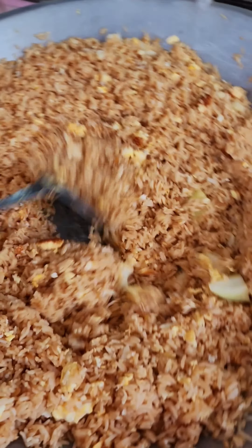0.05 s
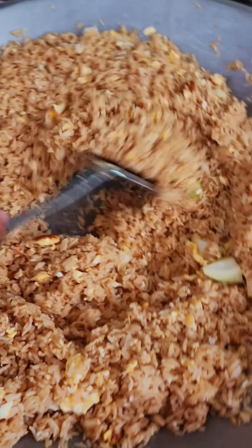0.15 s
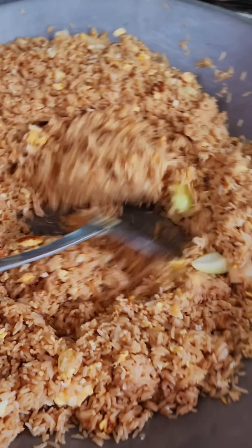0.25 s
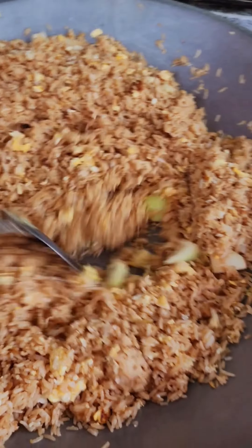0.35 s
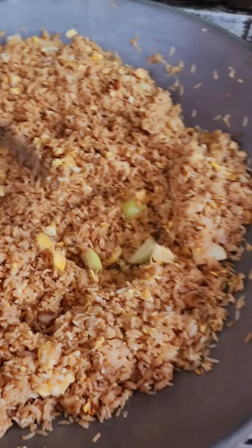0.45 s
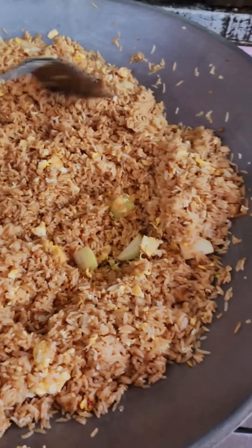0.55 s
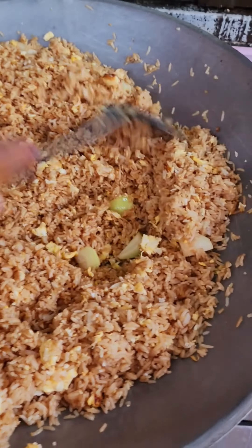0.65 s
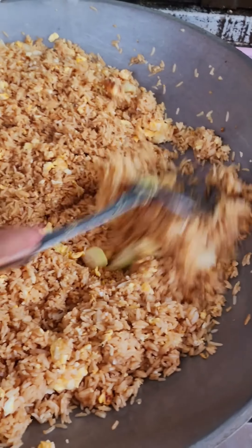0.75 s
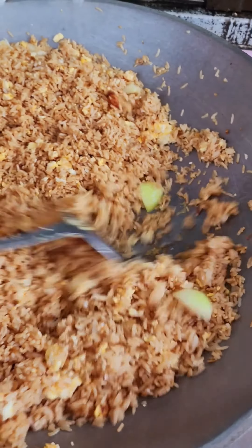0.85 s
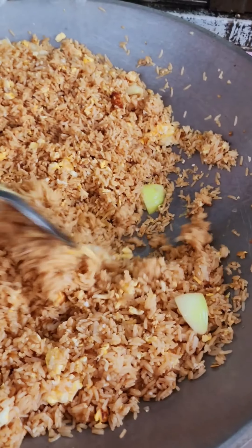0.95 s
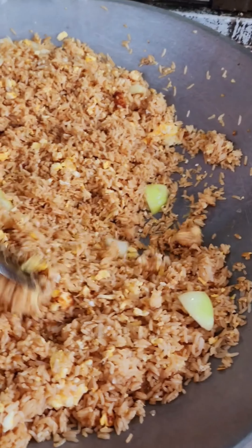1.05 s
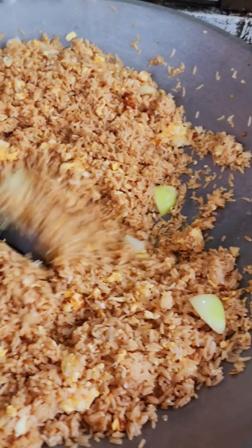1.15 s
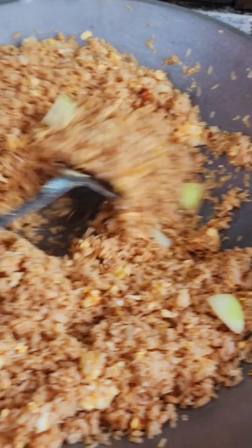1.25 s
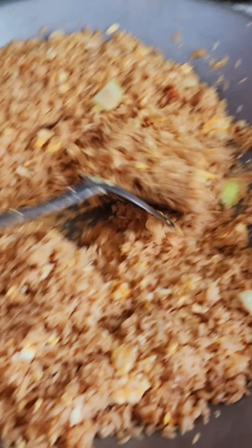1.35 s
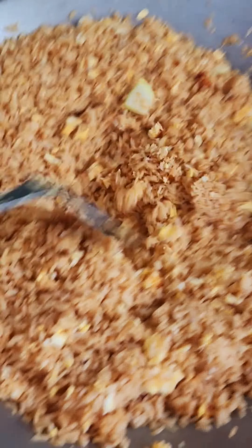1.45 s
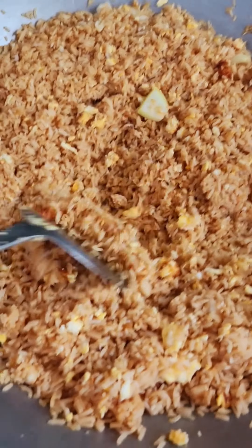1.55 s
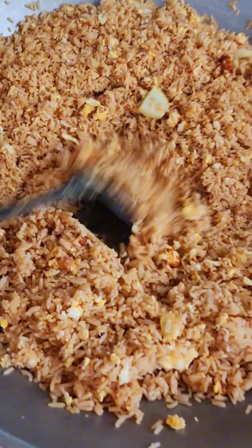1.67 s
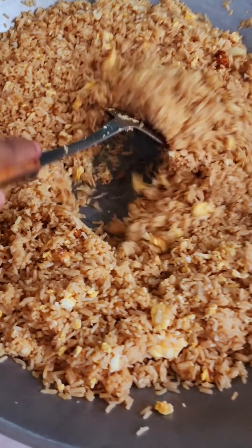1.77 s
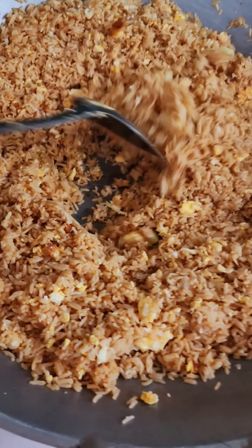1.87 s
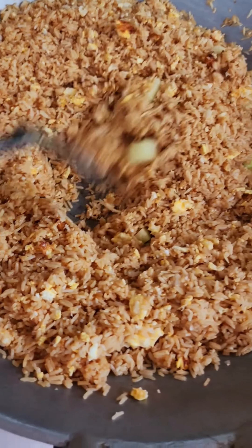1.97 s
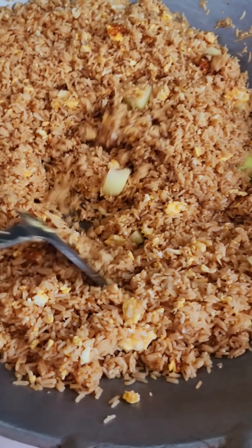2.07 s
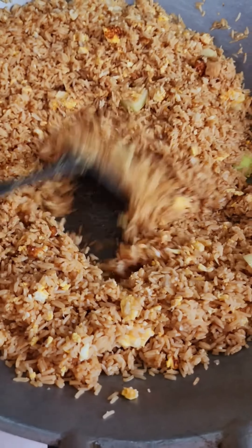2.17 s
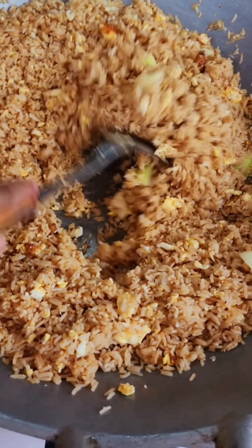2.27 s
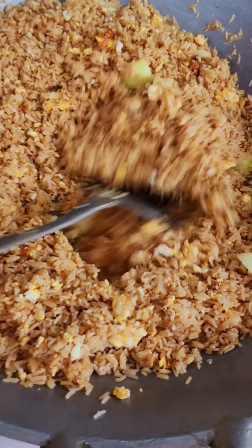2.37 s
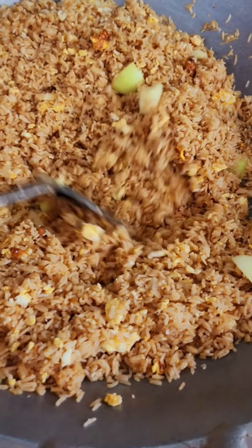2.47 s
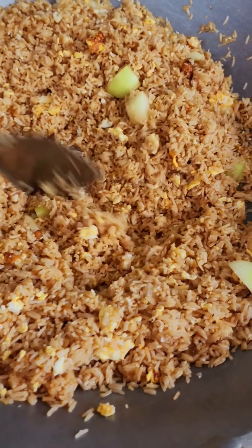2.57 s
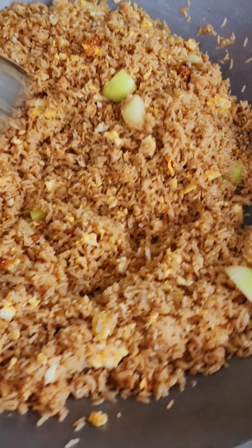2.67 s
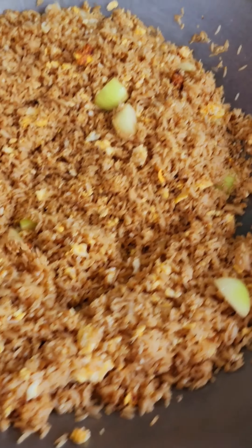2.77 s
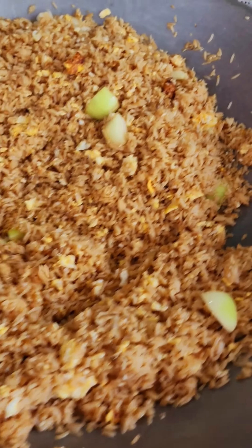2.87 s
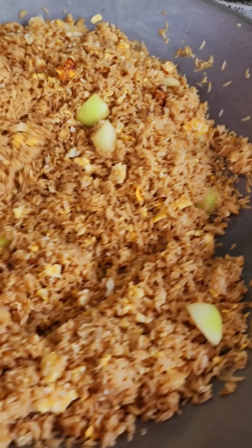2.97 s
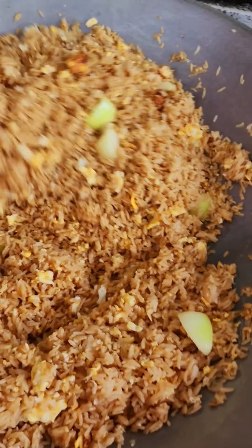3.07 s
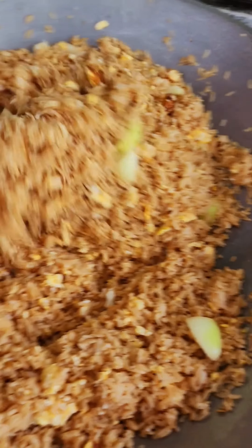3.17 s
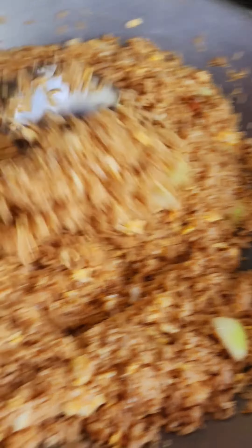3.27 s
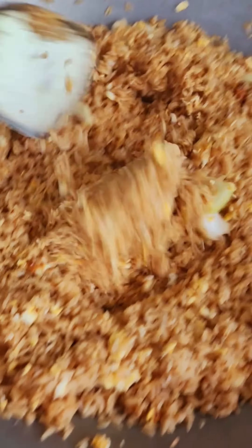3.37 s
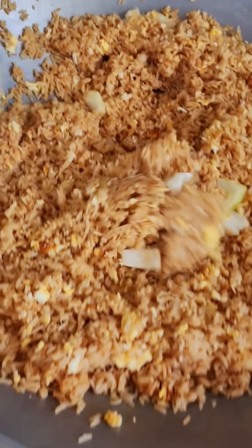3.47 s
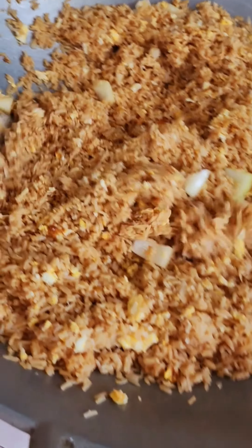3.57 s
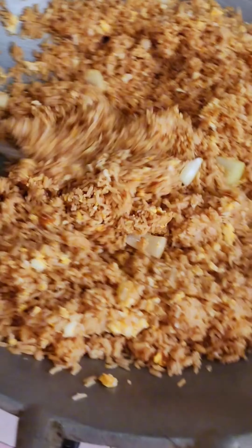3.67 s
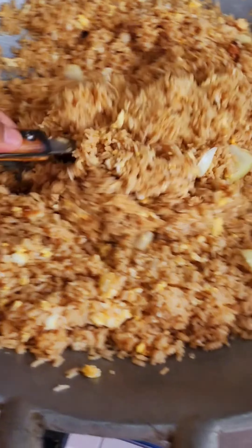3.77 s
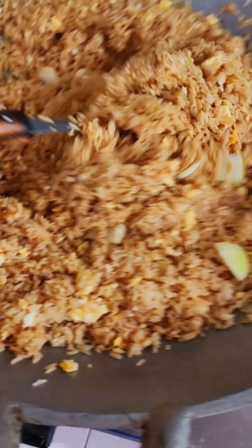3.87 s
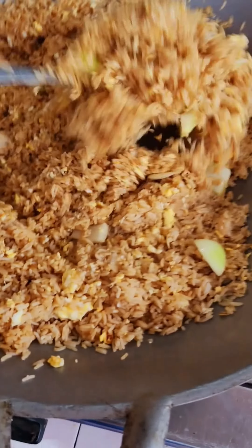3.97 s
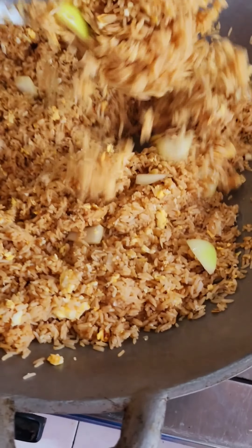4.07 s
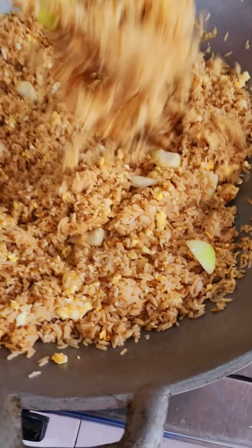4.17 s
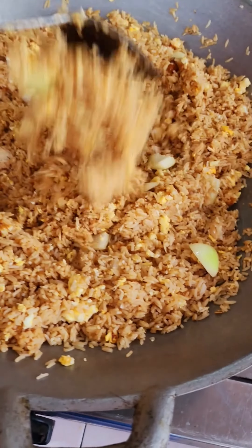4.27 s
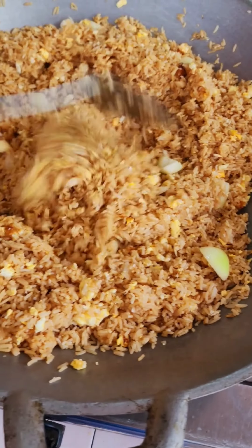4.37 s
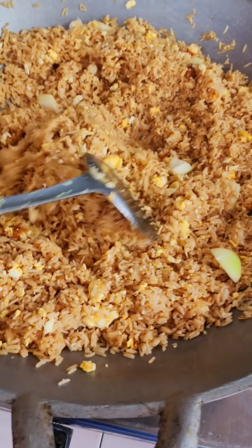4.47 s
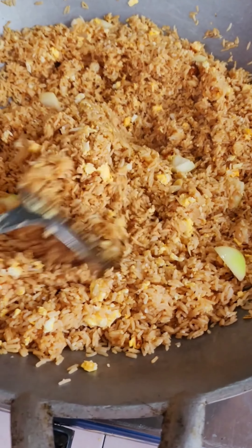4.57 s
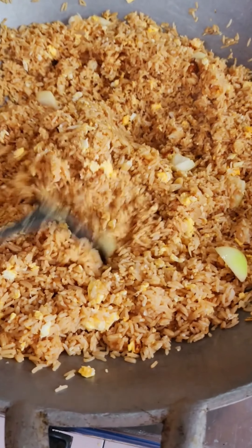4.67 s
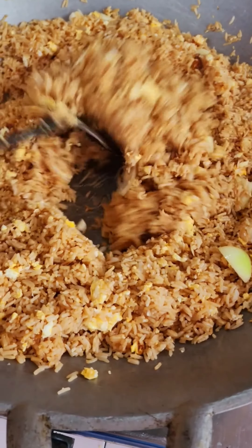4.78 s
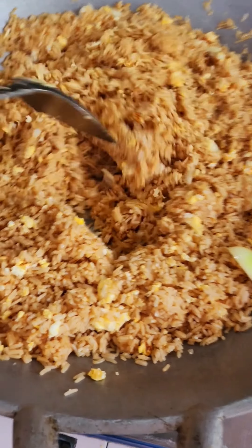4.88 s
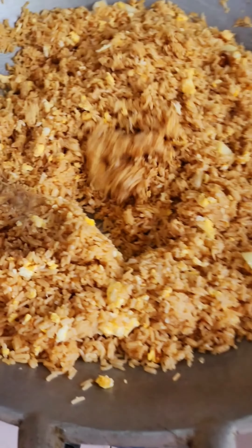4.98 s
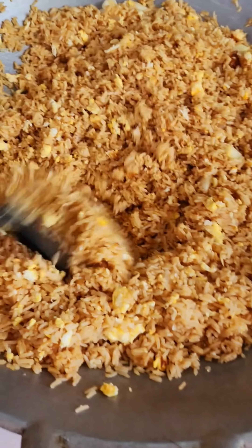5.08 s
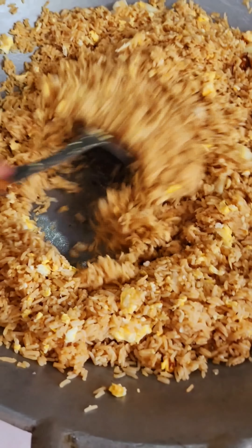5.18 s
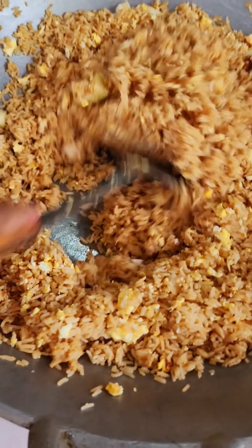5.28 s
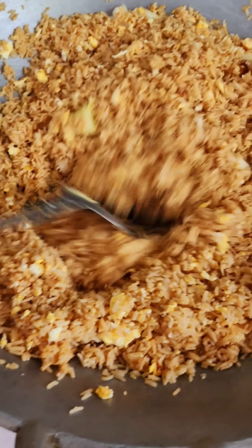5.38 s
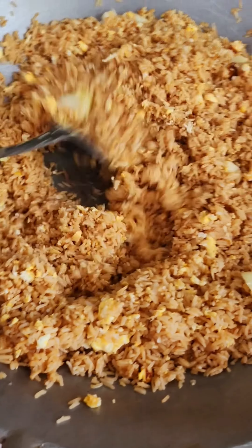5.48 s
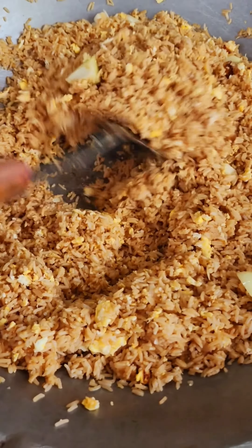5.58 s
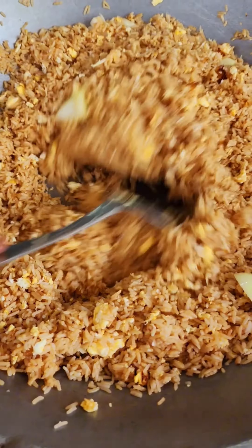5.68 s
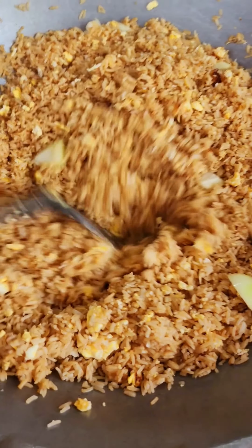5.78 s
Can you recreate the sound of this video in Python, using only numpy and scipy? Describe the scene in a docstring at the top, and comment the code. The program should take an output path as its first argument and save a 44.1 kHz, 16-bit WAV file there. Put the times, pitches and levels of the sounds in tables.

```python
"""A steel spatula clashes and scrapes in a wok of sizzling egg fried rice, close by, in a small kitchen.
It lands on the pan and is pushed along it: its slips ring the blade and the rice-damped bowl.
Tossed rice patters down. Bubbles burst in the hot oil throughout, surging as rice meets bare metal.
The gas flame rumbles below."""
import sys
import numpy as np
from scipy import signal
from scipy.fft import rfft, irfft, next_fast_len
from scipy.io import wavfile
from scipy.ndimage import uniform_filter1d, map_coordinates

SR = 44100
rng = np.random.default_rng(int(sys.argv[2]) if len(sys.argv) > 2 else 0)


def generate_wav(sig):
    """Save sig (samples, or channels by samples) to the path in sys.argv[1] as 16-bit PCM at SR."""
    pcm = np.round(np.clip(np.atleast_2d(sig).T, -1, 1) * 32767).astype(np.int16)
    wavfile.write(sys.argv[1], SR, pcm)


N = 257103

# Modes of the rice-damped bowl. Each row: frequency in Hz, level in dB, t60 in seconds.
BOWL_MODES = [(222.4, -14.5, 0.21), (282, -41, 0.024), (323, 5.5, 0.093), (362, -6.5, 0.047),
              (405, -18, 0.35), (534, -40, 0.036), (607, -18, 0.14), (768, -18.5, 0.038),
              (1010, -19.5, 0.034)]
# Modes of spatula and pan wall. Each row: frequency in Hz, level in dB, t60 in seconds.
STEEL_MODES = [(1393, -3.5, 0.1), (1484, -10.5, 0.026), (1528, -7.5, 0.075), (1578, 0.5, 0.036),
               (1733, 4.5, 0.024), (1874, -6.5, 0.037), (1992, -5, 0.13), (2111, -2.5, 0.13),
               (2193, -2.5, 0.27), (2334, 4, 0.048), (2430, -26, 0.089), (2580, 5, 0.024),
               (2870, -2, 0.071), (3140, -31, 0.038), (3480, -9, 0.1), (3377, -2.5, 0.049),
               (3500, -26, 0.026), (3900, -19, 0.02), (4230, 6, 0.032), (4430, -24, 0.055),
               (5650, -2, 0.019), (6580, -4, 0.024), (7270, -10, 0.024)]


def landings():
    """Each landing of the spatula cracks, rings the steel and knocks the bowl."""
    # Each row: start in seconds, clash gain in dB, knock gain in dB, bowl tuning ratio, bowl t60 ratio.
    blows = [(0.664, -14.5, -27, 1.11, 1.25), (1.0386, 3.5, -12.5, 1, 1.2), (1.1126, -11.5, -27, 1.06, 0.7),
             (1.513, 1.5, -13.5, 0.97, 1.1), (1.9949, 3.5, -15, 0.92, 0.59), (2.156, -17, -37, 1.25, 0.59),
             (2.698, -14.5, -38.5, 0.83, 1.2), (3.3894, -16, -53, 0.73, 0.85), (3.5605, -13, -44, 1, 1),
             (4.545, 2, -16, 1.01, 2.53), (4.6215, -14, -41, 0.97, 0.85), (4.971, 1, -13, 1.03, 0.85),
             (5.3554, -9.5, -33, 1.24, 1.2)]
    out = np.zeros((2, N + SR))
    for start_s, clash_db, knock_db, tuning, length in blows:
        crack = amp(-10) * clash(t60_s=0.014) + amp(-18) * clash(t60_s=0.12)
        metal = crack + amp(-31.5) * ring(STEEL_MODES, scatter_db=6, phase_rad=0.96, detune=0.0077)
        modes = np.array(BOWL_MODES) * [tuning, 1, length]
        bowl = ring(modes, scatter_db=1.5, phase_rad=0.56, detune=0.002)
        knock = band(bowl, 204, 6000) * pan(0.5)  # the bowl radiates no deep bass
        out[:, round(start_s * SR):][:, :SR // 6] += amp(clash_db) * metal + amp(knock_db) * knock
    return out[:, :N]


def scrapes():
    """All pushes of the spatula along the pan."""
    # Each row: start, attack and hold in seconds; gains in dB of bowl, scoop hollow, blade flat,
    # blade edge and grit; starting edge pitch in Hz.
    pushes = [ (0.0, 0.0016, .018, -31.5, -30, -34, -29, -37, 2600),
              (0.082, .01, 0.025, -35.5, -37, -37, -40, -51, 2580),
              (0.124, .03, 0.043, -42, -50, -36, -36, -40, 2700),
              (0.664, 0.0035, 0.014, -40, -32.5, -32, -29, -35, 2500),
              (0.69, 0.0042, 0.016, -44, -43, -30.5, -37, -46, 2600),
              (1.045, 0.0078, 0.062, -27.5, -35, -28, -29, -37, 2820),
              (1.524, 0.011, 0.073, -29, -35, -27.5, -30.5, -35, 2900),
              (2.007, 0.0068, 0.073, -27.5, -38.5, -27, -30.5, -31.5, 2920),
              (2.135, 0.011, 0.015, -36.5, -46, -53, -56, -57, 2600),
              (2.159, 0.015, .1, -55, -41.5, -35.5, -40.5, -45, 3160),
              (2.723, 0.012, 0.016, -38.5, -40, -43, -35, -40, 3600),
              (2.753, .015, 0.14, -44.5, -45, -38, -30, -38.5, 4070),
              (3.246, 0.018, .025, -56, -53, -52, -43, -59, 2720),
              (3.387, 0.0033, 0.15, -49, -44, -39.5, -30, -34.5, 4150),
              (3.554, .002, 0.0067, -46, -46, -18.5, -25.5, -30, 2500),
              (3.585, 0.0055, 0.017, -42, -42, -39, -34, -34, 2500),
              (3.631, 0.004, .005, -42, -38, -37, -35, -53, 2500),
              (4.554, 0.01, 0.033, -30, -37, -22, -27.5, -29.5, 3070),
              (4.62, 0.0049, 0.029, -31, -40.5, -28.5, -30.5, -40, 2700),
              (4.979, 0.015, 0.089, -26, -34, -24, -28.5, -27.5, 3560),
              (5.164, 0.013, 0.13, -43.5, -39.5, -37, -39.5, -47, 2600),
              (5.308, 0.036, 0.054, -33, -35, -30, -29, -36.5, 2700),
              (5.425, 0.0081, 0.032, -35.5, -30.5, -44, -39, -42, 2580),
              (5.498, 0.0097, 0.034, -31.5, -36, -30, -33.5, -39.5, 2660),
              (5.561, 0.017, .04, -44, -52, -30, -36.5, -42, 2600),
              (5.691, .025, 0.092, -33, -29.5, -32.5, -29.5, -38, 2730)]
    return sum(stroke(*row) for row in pushes)


def stroke(start_s, attack_s, hold_s, bowl_db, hollow_db, flat_db, edge_db, grit_db, edge_hz):
    """The blade bites, sticks and slips in bursts, and lifts; its edge pitch sinks until it lies flat."""
    # Modes of the scoop, rubbed by rice. Each row: frequency in Hz, level in dB, t60 in seconds.
    hollow_modes = [(444, 7, 0.071), (503.5, 2.5, 0.11), (571, -0.5, 0.052), (610.6, 0, 0.071),
                    (756, -2, 0.058), (831, -4, 0.049), (1027, -4, 0.028), (1045, -24, 0.044)]
    # Change in dB as the blade flattens: bowl, hollow, flat, edge, grit.
    flatten_db = (-4, -1, -2, -4, -6)
    lift_db_per_s, sink_hz_per_s, edge_floor_hz = 328, 11600, 2630
    start = max(round(start_s * SR), 0)
    size = min(SR // 3, N - start)
    t = np.arange(size) / SR
    pressure = np.minimum(t / attack_s, 1) * amp(-lift_db_per_s * np.maximum(t - attack_s - hold_s, 0))
    flatness = np.clip((t - attack_s) / hold_s, 0, 1)
    pitch_hz = np.maximum(edge_hz - sink_hz_per_s * hold_s * flatness, edge_floor_hz)
    slips = ticks(per_s=2600, scatter_db=4, size=size) * amp(2.5 * wobble(130, size))

    rub = lambda response: excite(slips, response)[:, :size]
    steel = rub(clash(t60_s=0.02))
    steel += amp(-17.5) * rub(ring(STEEL_MODES, scatter_db=2, phase_rad=1, detune=0.012))
    bowl = rub(ring(BOWL_MODES, scatter_db=-1.5, phase_rad=0.33, detune=0.0086))
    bowl = steady(band(bowl, 187, 458), 0.027)
    hollow = rub(ring(hollow_modes, scatter_db=5, phase_rad=0.94, detune=0.015))
    hollow = amp(-2) * steady(band(hollow, 430, 1300), 0.029) * pan(1.8)
    flat = amp(-5) * steady(band(steel, 1457, 1781), 0.069)  # favours one tight cluster of modes
    flat += amp(-1) * steady(band(steel, 1543, 2380) + amp(-3) * band(steel, 1320, 1330), 0.05)
    edge = amp(-4) * unit(band(steel, 2120, 4540))
    edge += amp(1.86) * steady(sliding_band(steel, pitch_hz, width_hz=1270), 0.014)
    grit = amp(2.5) * unit(band(steel, 5360, 9430)) + amp(-4) * unit(band(steel, 10740, 15600))

    gains_db = (bowl_db, hollow_db, flat_db, edge_db, grit_db)
    parts = zip((bowl, hollow, flat, edge, grit), gains_db, flatten_db)
    sound = pressure * sum(part * amp(db + change_db * (flatness - 0.5)) for part, db, change_db in parts)
    return np.pad(sound, ((0, 0), (start, N - start - size)))


def clash(t60_s):
    """The countless short-lived high modes of thin steel."""
    # Each row: frequency in Hz, spectral density in dB.
    spectrum = [(150, -36), (500, -16), (1050, -15), (1450, -2), (2800, -0.5), (4500, -5), (7500, -9.5),
                (9800, -17.5), (12000, -12), (16000, -22)]
    return spread(rng.standard_normal((2, SR // 6)), spectrum) * decay(t60_s)


def sizzle():
    """Fine fizz from the oil film, coarser frying from wet rice and egg."""
    # Each row of both: frequency in Hz, spectral density in dB.
    fizz_spectrum = [(1000, -45), (5000, -6), (8000, 1), (9800, -5.5), (11700, 1.5), (13500, 1),
                     (15800, -1.5)]
    frying_spectrum = [(200, -0.5), (500, -9), (800, -2.5), (1100, -4), (1600, 1.5), (2400, -2.5),
                       (4200, 2), (5500, 1.5), (7500, 0.5), (9600, -6), (15000, -7)]
    fizz_db, frying_db = surge_levels_db()
    flicker = wobble(45)
    fine = bubbles(per_s=9000, scatter_db=4, steam_db=1)
    coarse = bubbles(per_s=4000, scatter_db=4.5, steam_db=1)
    fizz = amp(fizz_db + 4.5 + 0.5 * flicker) * spread(fine, fizz_spectrum) * pan(1.8)
    frying = amp(frying_db + 3 + flicker) * spread(coarse, frying_spectrum) * pan(0.3)
    return fizz + frying


def surge_levels_db():
    """Fizz and frying gains: turned rice meets hot metal, its moisture flashes, then dries off."""
    # Each row: start in seconds, fizz gain in dB, frying gain in dB.
    surges = [(-0.05, -40.5, -38), (0.12, -38, -41), (0.25, -42, -42), (0.67, -46, -33), (0.85, -45, -54),
              (1.23, -40, -48), (1.67, -41, -55), (2.16, -38, -37), (2.74, -46, -34.5), (2.92, -44, -45),
              (3.2, -60, -39.5), (3.44, -45, -37.5), (3.68, -36, -33.5), (4.16, -52, -34.5),
              (4.68, -37, -38.5), (5.12, -36, -36.5), (5.52, -36.5, -35.5), (5.72, -48, -34)]
    calm_db, rise_s, fall_db_per_s = -43, 0.051, 18.5
    t = np.arange(N) / SR
    power = amp(calm_db) ** 2
    for start_s, fizz_db, frying_db in surges:
        rise = np.clip((t - start_s) / rise_s, 0, 1)
        fall = amp(-fall_db_per_s * np.maximum(t - start_s - rise_s, 0))
        power = power + (amp([[fizz_db], [frying_db]]) * rise * fall) ** 2
    return 10 * np.log10(power)


def bubbles(per_s, scatter_db, steam_db):
    """Tiny bubbles burst over a hiss of steam, each with a random polarity per channel."""
    pops = ticks(per_s, scatter_db) * np.sign(rng.standard_normal((2, N)))
    return pops + amp(steam_db) * rng.standard_normal((2, N))


def falling_rice():
    """Soft grains patter down in one swell per toss."""
    # Each row: peak time in seconds, level in dB, half length in seconds.
    tosses = [(3.805, -42, 0.025), (4.22, -35, 0.037), (4.368, -42, 0.027)]
    # Each row: frequency in Hz, spectral density in dB.
    spectrum = [(100, 1), (250, 6), (550, -28), (850, 1), (1350, 5), (2200, -8), (5000, -5), (12000, -28)]
    t = np.arange(N) / SR
    shower = sum(amp(db) * np.exp(-((t - peak_s) / half_s) ** 2) for peak_s, db, half_s in tosses)
    grains = np.array([ticks(per_s=1800, scatter_db=6.5), ticks(per_s=1500, scatter_db=5)])
    return shower * spread(grains, spectrum)


def burner():
    """The gas flame rumbles and stirs the cavity under the wok."""
    # Each row: frequency in Hz, spectral density in dB.
    spectrum = [(15, -35), (35, -32), (55, -8.5), (75, -5.5), (102, 0.5), (135, -1), (175, -7), (225, -3.5),
                (290, -11), (420, -15), (520, -19.5), (900, -21.5), (2500, -81)]
    # Each row: frequency in Hz, level in dB, t60 in seconds.
    cavity_modes = [(419, -0.5, 0.28), (799, -1.5, 0.11), (890, 0.5, 0.067)]
    rumble = amp(-41.5 + 0.69 * wobble(4.9)) * spread(rng.standard_normal((2, N)), spectrum)
    hum = excite(rng.standard_normal(N), ring(cavity_modes, scatter_db=-1, phase_rad=0.35, detune=0.002))
    return rumble + amp(-50.5) * unit(hum)


def kitchen(x):
    """Hard walls return a short reverberation."""
    # Each row: frequency in Hz, t60 in seconds.
    reverb_times = [(200, 0.1), (2000, 0.3), (12000, 0.25)]
    hz, t, noise = signal.stft(rng.standard_normal((2, SR // 2)), SR, nperseg=256)
    envelope = np.exp(-np.log(1000) * t / along(reverb_times, hz)[:, None])
    tail = signal.istft(noise * envelope, SR, nperseg=256)[1]
    tail /= np.linalg.norm(tail[0])
    return excite(x, np.pad(tail, ((0, 0), (SR // 150, 0))))


def ring(modes, scatter_db, phase_rad, detune):
    """Stereo modal response; pitches shift per contact, strength and phase vary per channel."""
    t = np.arange(SR // 6) / SR
    out = np.zeros((2, len(t)))
    for hz, db, t60_s in modes:
        strength, phase = rng.standard_normal((2, 2, 1))
        pitch_hz = hz * (1 + detune * rng.standard_normal())
        tone = np.sin(2 * np.pi * pitch_hz * t + phase_rad * phase)
        out -= amp(db + scatter_db * strength) * decay(t60_s) * tone
    return out


def spread(pair, spectrum):
    """Two unrelated signals become a coloured stereo pair of rms 1, alike in the bass only."""
    # Each row: frequency in Hz, left-right correlation.
    likeness = [(240, 0.99), (480, 0.11), (950, 0.19), (1900, 0.25), (3800, 0), (15000, 0.032)]

    def response(hz):
        angle = np.arccos(np.clip(along(likeness, hz), -1, 1)) / 2
        return amp(along(spectrum, hz)) * [np.cos(angle), np.sin(angle)]

    mid, side = filtered(pair, response)
    return unit(np.array([mid + side, mid - side]))


def ticks(per_s, scatter_db, size=N):
    """Randomly timed impulses of uneven size, rms 1."""
    happens = rng.random(size) < per_s / SR
    sign = np.sign(rng.standard_normal(size))
    strength = np.clip(rng.standard_normal(size), -2.5, 2.5)
    return unit(happens * sign * amp(scatter_db * strength))


def wobble(knots_per_s, size=N):
    """Smooth random curve."""
    knots = rng.standard_normal(int(size * knots_per_s / SR) + 4)
    return map_coordinates(knots, [np.arange(size) * knots_per_s / SR])


def steady(x, window_s):
    """Running rms held near 1: constant pressure keeps a rubbed mode from swelling or dying."""
    power = uniform_filter1d(np.mean(x ** 2, axis=0), max(int(window_s * SR), 1))
    return x / np.sqrt(np.abs(power) + np.mean(x ** 2) / 20)


def decay(t60_s):
    """A sixth of a second of exponential decay."""
    return np.exp(-np.log(1000) * np.arange(SR // 6) / SR / t60_s)


def excite(force, response):
    """A force drives a stereo impulse response."""
    return signal.fftconvolve(np.atleast_2d(force), response, axes=1)[:, :N]


def band(x, lo_hz, hi_hz):
    """Causal band-pass."""
    return signal.sosfilt(signal.butter(3, [lo_hz, hi_hz], 'band', fs=SR, output='sos'), x)


def sliding_band(x, hz, width_hz):
    """Band-pass that follows a pitch curve."""
    carrier = np.exp(2j * np.pi * np.cumsum(hz) / SR)
    narrow = signal.sosfilt(signal.butter(2, width_hz / 2, fs=SR, output='sos'), x / carrier)
    return np.real(narrow * carrier)


def filtered(x, response):
    """Apply a gain given as a function of Hz."""
    size = x.shape[-1]
    padded = next_fast_len(size + SR // 4)
    return irfft(rfft(x, padded) * response(np.fft.rfftfreq(padded, 1 / SR)), padded)[..., :size]


def along(points, hz):
    """Interpolate (Hz, value) points on a log frequency axis."""
    knots_hz, values = np.transpose(points)
    return np.interp(np.log(hz + 1), np.log(knots_hz + 1), values)


def pan(db):
    """Stereo gains: left up by db, right down by db."""
    return amp([[db], [-db]])


def amp(db):
    """Decibels to gain."""
    return 10 ** (np.asarray(db) / 20)


def unit(x):
    """Scale to rms 1."""
    return x / np.sqrt(np.mean(x ** 2) + 1e-20)


def scene():
    """Spatula, its echo, falling rice, oil and flame."""
    spatula = landings() * pan(0.4) + scrapes()
    return spatula + amp(-9) * kitchen(spatula) + falling_rice() + sizzle() + burner()


def record(dry):
    """Peaks round off near full scale; a steep low-pass follows."""
    cutoff_hz = 15950
    rounded = dry / (1 + np.abs(dry) ** 6) ** (1 / 6)
    return filtered(rounded, lambda hz: 1 / (1 + (hz / cutoff_hz) ** 200))


dry = scene()
out = record(dry)
generate_wav(out)
```